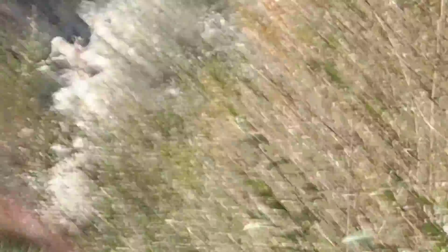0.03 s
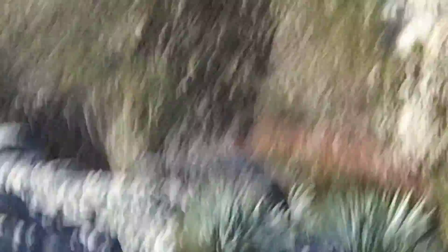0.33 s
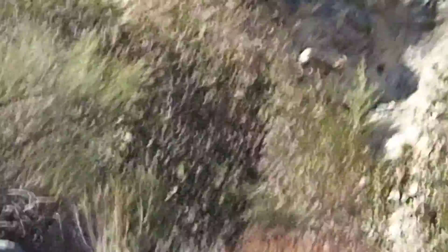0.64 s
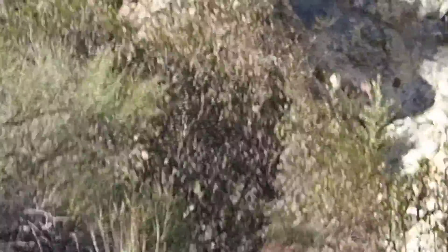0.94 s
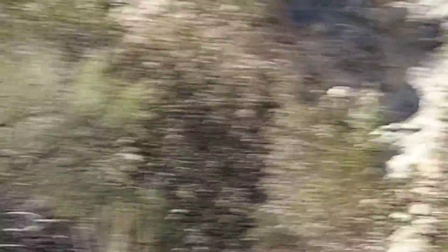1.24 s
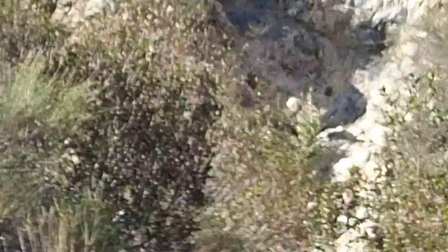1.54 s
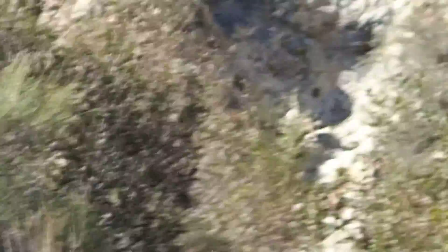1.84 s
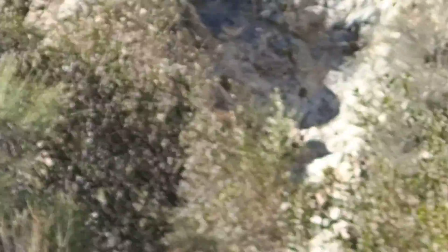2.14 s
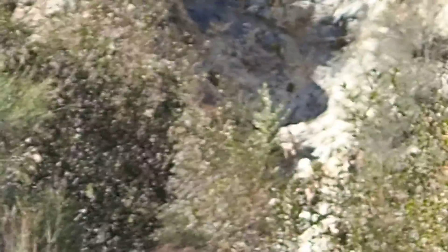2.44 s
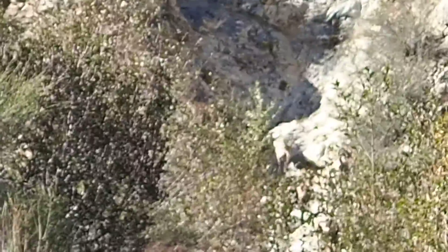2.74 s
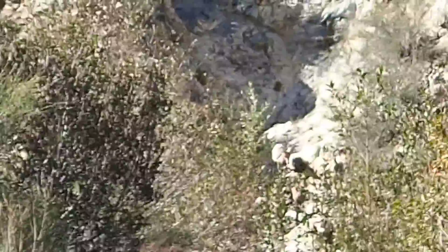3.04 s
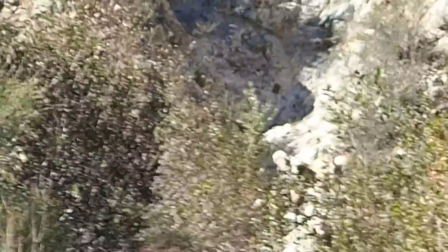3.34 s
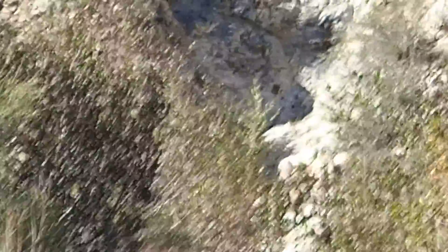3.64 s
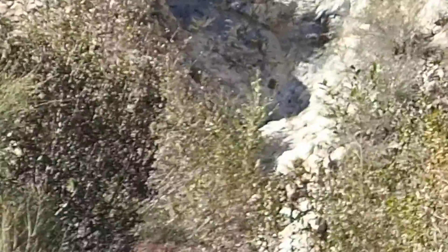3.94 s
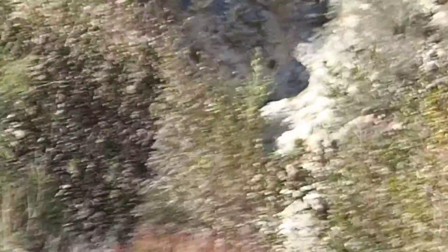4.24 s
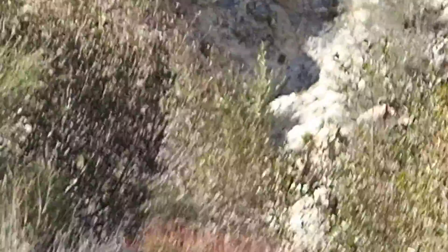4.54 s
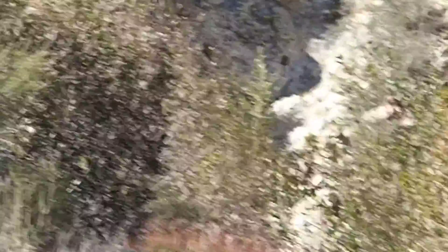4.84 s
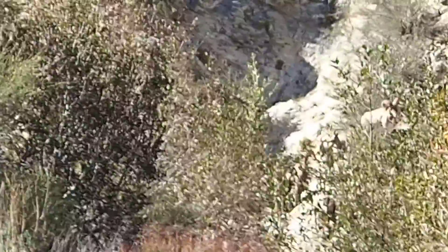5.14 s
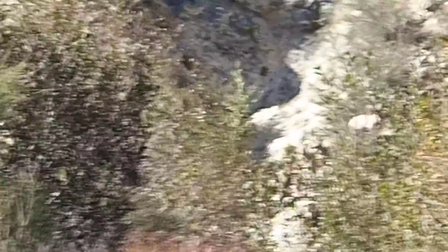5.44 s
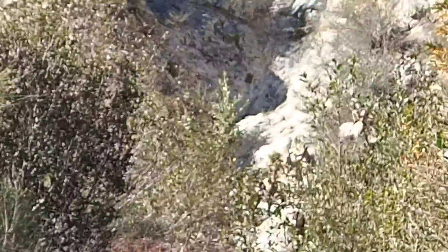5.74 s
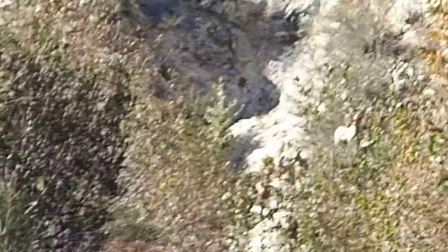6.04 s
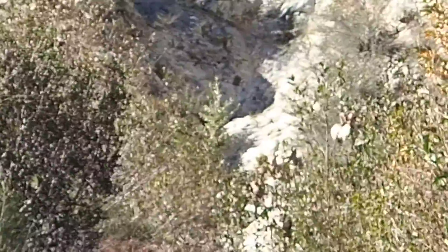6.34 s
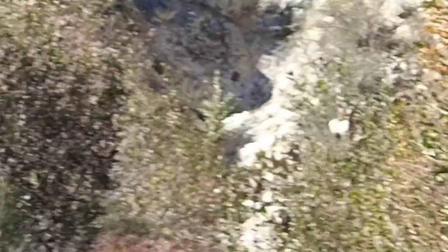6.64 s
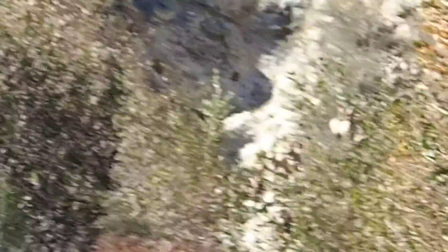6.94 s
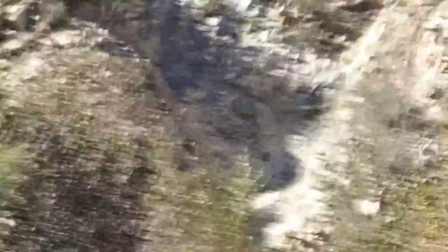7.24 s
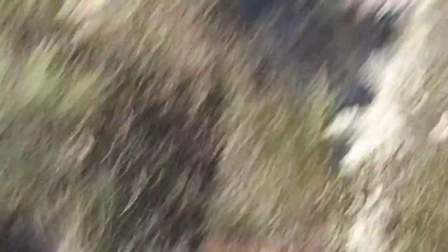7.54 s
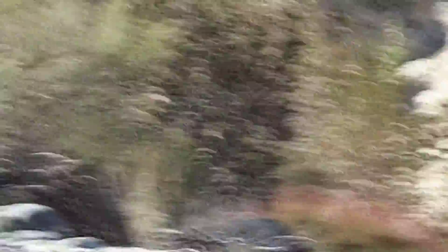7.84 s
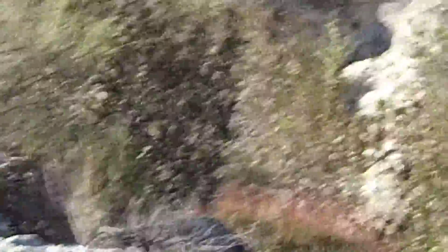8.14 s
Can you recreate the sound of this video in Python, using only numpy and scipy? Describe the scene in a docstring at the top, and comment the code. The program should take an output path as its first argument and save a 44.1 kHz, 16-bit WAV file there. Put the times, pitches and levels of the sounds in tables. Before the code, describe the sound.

A stream rushes steadily outdoors while rising gusts of wind thump and flap on the microphone, with a few sleeve swishes.

```python
"""A stream rushes at the foot of a brushy mountain slope, heard from a hand-held camera.
Its white water is a wash of noise, with air pockets ringing in it and droplets falling back.
Wind rises, mostly from the right: its eddies thump and flap right on the two microphone ports,
and the strongest make the limiter duck the stream. Close by, a sleeve swishes as the camera is swung."""
import sys
import numpy as np
from scipy import signal
from scipy.fft import rfft, irfft, next_fast_len
from scipy.io import wavfile
from scipy.ndimage import uniform_filter1d, map_coordinates

SR = 44100
rng = np.random.default_rng(int(sys.argv[2]) if len(sys.argv) > 2 else 0)


def to_wav(s):
    """Save 16-bit WAV."""
    ch = np.atleast_2d(s).T  # columns
    pcm = np.round(np.clip(ch, -1, 1) * 32767)  # PCM
    wavfile.write(sys.argv[1], SR, pcm.astype(np.int16))


N = 365148
T = np.arange(N) / SR
PORTS = np.array([[.5], [-.5]])  # splits a left-minus-right value between the two ports

# How alike the water is at the two ports. Each row: frequency in Hz, likeness from -1 (opposed) to 1.
WATER_LIKENESS = [(100, 0.69), (550, 0.87), (2600, 1), (4100, 1), (4700, 0.71), (5400, 0.37), (5800, -0.27),
                  (6200, -0.78), (7200, -0.67), (8500, -0.024), (10000, 0.18), (13000, -0.24)]
# The heaviest pressure swings in the gusts. Each row: centre in seconds, left and right level in dB.
PRESSURE_SLAMS = [(3.795, 0, -19.5), (4.122, -25, -9.5), (4.587, -7, 5.5), (4.671, -8, -4.5),
                  (4.812, -10.5, -4.5), (4.913, -12, -5), (5.163, -11, 0), (5.341, 3, 5.5), (6.137, 1, -15),
                  (6.194, -9, -3.5), (6.383, -5, -6), (6.46, 5, 9.5), (6.516, 6.5, -3), (6.578, 5, -4),
                  (6.65, -5, 1.5), (6.783, -12, -4), (7.041, -14.5, -10), (7.29, -9.5, -1.5),
                  (7.898, -9, -10)]
# Sharp pops inside the hardest gusts. Each row: start in seconds, level in dB.
PRESSURE_POPS = [(4.072, -24), (4.807, -4.5), (5.16, -6.5), (5.344, 1), (6.332, -12.5), (6.388, 0.5),
                 (6.452, -12), (6.46, 2.5)]


def amp(db):
    """Decibels to gain."""
    return 10 ** (np.asarray(db) / 20)


def unit(x):
    """x at rms 1."""
    return x / np.sqrt(np.mean(x ** 2) + 1e-20)


def along(points, hz):
    """(Hz, value) points joined on a log axis."""
    f, v = np.transpose(points)
    return np.interp(np.log(hz + 1), np.log(f + 1), v)


def wobble(rate):
    """A smooth random curve, rate knots a second."""
    return map_coordinates(rng.standard_normal(int(N * rate / SR) + 4), [T * rate])


def swell(at, rise, fall, hold=0):
    """An envelope that reaches 1 at the given time, holds and falls; all in seconds."""
    return np.exp(-(np.minimum(T - at, 0) / rise) ** 2 - (np.maximum(T - at - hold, 0) / fall) ** 2)


def filtered(x, response):
    """x times a response of frequency."""
    m = next_fast_len(x.shape[-1] + 8192)
    return irfft(rfft(x, m) * response(np.fft.rfftfreq(m, 1 / SR)), m)[..., :x.shape[-1]]


def rush(spectrum, likeness, patchy_db):
    """Stereo noise of rms 1 with brief patches of random gain, coloured by the camera's housing."""
    # The housing's peaks and notches. Each row: centre in Hz, width in Hz, gain in dB.
    housing = [(1870, 71, -9), (3013, 170, 5), (3400, 63, -9), (4033, 216, -6.5), (4578, 170, 8),
               (4810, 38, -26), (5170, 370, 7), (8030, 610, 5)]

    def mid_side_response(hz):
        housing_db = sum(db * np.exp(-((hz - centre) / width) ** 2) for centre, width, db in housing)
        angle = np.arccos(np.clip(along(likeness, hz), -1, 1)) / 2
        return amp(along(spectrum, hz) + housing_db) * [np.cos(angle), np.sin(angle)]

    bins = signal.stft(rng.standard_normal((2, N)), nperseg=512)[2]
    patches = uniform_filter1d(rng.standard_normal(bins.shape[1:]), size=5, axis=0)
    patches = unit(uniform_filter1d(patches, size=6, axis=1))
    noise = signal.istft(bins * amp(patchy_db * patches), nperseg=512)[1][:, :N]
    mid, side = filtered(noise, mid_side_response)
    return unit(np.array([mid + side, mid - side]))


def spray():
    """Droplets fall back on the water in faint, irregular spits and a few small splashes."""
    # The droplets' hiss. Each row: frequency in Hz, relative level in dB.
    spectrum = [(500, -29), (2500, -10), (5000, 12), (8000, -9), (15000, -14)]
    # Splashes on the rocks. Each row: centre in seconds, level in dB.
    rock_splashes = [(1.157, -43.5), (2.62, -44.5), (3.26, -43.5), (3.72, -43), (4.451, -43), (5.9, -37.5)]
    spits = amp(-54) * unit(amp(13.0 * np.tanh(wobble(140)) + 2.2 * wobble(9.8)))
    splashes = sum(amp(db) * np.exp(-((T - at) / 0.0057) ** 2) for at, db in rock_splashes)
    return (spits + splashes) * rush(spectrum, WATER_LIKENESS, patchy_db=1.5)


def bubbles(count, pitch_hz, spread_octaves, cycles, size_db):
    """Small air pockets ring in the water, each rising a little in pitch as it dies."""
    when, pitch, size = rng.random((3, count, 1))
    hz = pitch_hz * 2 ** (spread_octaves * (2 * pitch - 1))
    t = np.arange(SR // 25) / SR
    age = t * hz / cycles
    envelope = amp(-size_db * np.log(size + 0.033)) * age * np.exp(-2 * age)
    rings = envelope * np.sin(2 * np.pi * hz * t * (1 + 0.034 * age))
    index = (when * N).astype(int) + np.arange(len(t))
    return unit(np.bincount(index.ravel(), rings.ravel(), N)[:N])


def gurgles():
    """Larger air pockets close to the bank, each a short rising plop."""
    # Single plops. Each row: start in seconds, starting pitch in Hz, level in dB.
    plops = [(0.794, 1113, -33), (1.02, 898, -34.5), (1.58, 804, -35.5), (1.909, 651, -33),
             (4.213, 1220, -33), (5.769, 1227, -32.5), (6.069, 1020, -31.5)]
    out = np.zeros(N)
    age = np.arange(SR // 16) / SR / 0.0029
    for start, hz, db in plops:
        phase = 2 * np.pi * np.cumsum(hz * (1 + 0.0019 * age)) / SR
        out[round(start * SR):][:len(age)] += amp(db) * age * np.exp(1 - age) * np.sin(phase)
    return out


def stream():
    """White water with a soft babble in it, all wavering with the flow."""
    # The white water's rush. Each row: frequency in Hz, relative level in dB.
    spectrum = [(25, -24), (70, -24), (150, 2), (280, 3.5), (450, -2), (620, 0.5), (1250, -2), (1700, -4),
                (2100, -8.5), (2600, -15.5), (4000, -15.5), (6000, -10.5), (9500, -20), (15500, -25.5)]
    flow = amp(0.35 * wobble(2.2506) + 0.77 * wobble(11))
    white_water = amp(-41.5) * rush(spectrum, WATER_LIKENESS, patchy_db=1.57)
    babble = amp(-52) * bubbles(count=2000, pitch_hz=986, spread_octaves=0.752, cycles=4.0, size_db=7.5)
    return flow * (white_water + babble + gurgles())


def bearing(water, left_lag_s=2e-5):
    """The water lies slightly to the right, and the housing shades the left port."""
    # The water's balance at the ports. Each row: frequency in Hz, left minus right in dB.
    balance = [(60, 3), (130, 0.5), (290, -2.5), (640, -2.0), (1410, -2.5), (3100, 1), (6820, -0.5),
               (15000, -3)]
    delay = lambda hz: np.exp(-2j * np.pi * hz * PORTS * left_lag_s)
    return filtered(water, lambda hz: amp(PORTS * along(balance, hz)) * delay(hz))


def sleeve():
    """Cloth slides on cloth beside the microphone in short, slightly scratchy strokes."""
    # The sleeve's strokes. Each row: peak time, rise and fall in seconds, level in dB.
    swishes = [(.003, .01, 0.014, -36.5), (.088, 0.029, 0.036, -32.5), (.145, 0.027, 0.037, -40),
               (4.75, 0.027, 0.014, -46), (5.88, 0.076, .05, -61), (7.562, 0.075, 0.018, -38.5),
               (7.582, 0.011, 0.0069, -30), (7.745, 0.14, 0.076, -40), (8.059, 0.049, 0.087, -38)]
    # The cloth's hiss. Each row: frequency in Hz, relative level in dB.
    spectrum = [(300, -21), (2500, -16.5), (4500, -5.5), (5600, 3), (6800, -1.5), (8200, -5.5),
                (9500, -8.5), (11000, -20), (15500, -19)]
    # How alike it is at the two ports. Each row: frequency in Hz, likeness from -1 to 1.
    likeness = [(2000, .8), (5000, 0.11), (6500, -0.37), (12000, -0.5)]
    strokes = sum(amp(db) * swell(at, rise, fall) for at, rise, fall, db in swishes)
    scratch = amp(1.8 * wobble(250))
    return strokes * scratch * rush(spectrum, likeness, patchy_db=3) * amp([[-1], [1]])


def airflow():
    """Pressure in dB at the two ports: gusts and slams swell out of the breeze, and eddies stir both."""
    # The rising breeze between gusts. Each row: time in seconds, pressure in dB.
    breeze = [(0, -45), (.7, -48), (1.2, -43.5), (1.7, -48), (2.6, -46), (3.25, -35), (3.5, -46),
              (4.12, -30), (4.35, -46), (4.53, -42), (4.8, -24), (5.02, -35), (5.33, -21), (5.58, -41),
              (6.05, -39), (6.55, -13), (6.88, -29), (7.4, -22), (8.28, -26)]
    # Gusts on the ports. Each row: start and length in seconds, pressure in dB, left minus right in dB.
    gusts = [(0.087, .05, -35, 5.5), (0.414, 0.04, -24.5, -6), (1.104, 0.026, -35, 1),
             (1.441, 0.021, -33.5, 14), (2.221, 0.064, -29, 2), (2.814, .02, -26, 6),
             (2.972, 0.07, -28, -3), (3.113, 0.038, -26, -10), (3.21, .11, -27.5, -5),
             (3.584, 0.032, -26, -1), (3.796, .08, -16, 3), (3.89, 0.08, -30, -18), (4.06, 0.093, -20, -2),
             (4.629, 0.051, -13, -3), (4.793, 0.041, -14, -8), (4.905, 0.042, -14, 1),
             (5.156, 0.041, -14, -2), (5.335, 0.031, -4.5, -6), (5.436, 0.061, -27, -3),
             (5.655, 0.15, -26, -3), (5.924, .02, -33, -14), (6.109, .09, -13, -3.5),
             (6.26, 0.075, -18, -5), (6.382, .025, -10, -2), (6.511, 0.068, -4.5, 2), (6.629, .06, -13, -5),
             (6.835, 0.038, -22.5, -11), (6.959, 0.051, -22, -5), (7.041, 0.048, -14.5, -7),
             (7.286, 0.039, -14.5, -6.5), (7.485, 0.18, -18.5, -4), (7.829, 0.087, -18.5, -6.5),
             (7.996, 0.033, -17.5, 5.5), (8.15, 0.036, -22, -0.5)]
    breeze_side_db, sag_db_per_s, swirl_db, eddies_per_s = -4.5, 22, -11, 48
    power = amp(np.interp(T, *np.transpose(breeze)) + PORTS * breeze_side_db) ** 2
    for start, length, db, side_db in gusts:
        sag_db = sag_db_per_s * np.clip(T - start, 0, length)  # a gust is strongest at its front
        envelope = swell(start, rise=.009, fall=.016, hold=length)
        power += (amp(db - sag_db + PORTS * side_db) * envelope) ** 2
    for at, left_db, right_db in PRESSURE_SLAMS:  # rough air swirls round each slam
        power += (amp([[left_db], [right_db]]) * amp(swirl_db) * swell(at, rise=.012, fall=.012)) ** 2
    shared_eddies, left_eddies, right_eddies = (np.tanh(wobble(eddies_per_s)) for _ in range(3))
    return 10 * np.log10(power) + 2.5 * shared_eddies + 3 * np.array([left_eddies, right_eddies])


def flaps(flow_db):
    """The flow lets go of a port for milliseconds and flaps: fitfully in wind, and at each slam and pop."""
    # Flapping at a port's edge. Each row: frequency in Hz, relative level in dB.
    spectrum = [(100, -17), (300, 5.5), (520, 2), (750, -5.5), (1100, -14), (1600, -27), (2500, -41),
                (4500, -46), (9000, -88)]
    growth_db_per_db, fit_depth_db, slam_lag_s = 1.815, 15.5, 0.0029
    fits = np.tanh([wobble(110), wobble(110)])
    strength = amp(-17 + growth_db_per_db * flow_db + fit_depth_db * fits)
    for at, left_db, right_db in PRESSURE_SLAMS:
        envelope = swell(at + slam_lag_s, rise=0.0095, fall=0.0095)
        strength += amp([[left_db], [right_db]]) * amp(-18) * envelope
    for at, db in PRESSURE_POPS:
        strength += amp(db - 11.5) * swell(at, rise=0.0088, fall=0.0088)
    noise = unit(filtered(rng.standard_normal((2, N)), lambda hz: amp(along(spectrum, hz))))
    local_power = np.abs(uniform_filter1d(noise ** 2, size=300))
    return strength * unit(noise / np.sqrt(local_power + .02))


def pops(push_s=0.0014, dull_hz=2600):
    """Flow tears off a port's edge: an abrupt push and a slower pull, louder on the right."""
    out = np.zeros(N)
    age = np.arange(SR // 50) / SR / push_s
    for start, db in PRESSURE_POPS:
        out[round(start * SR):][:len(age)] += amp(db) * (1 - age) * np.exp(-age)
    return filtered(out, lambda hz: 1 / (1 + 1j * hz / dull_hz) ** 2) * amp([[-4], [0]])


def slams(width_s=.0017):
    """Each slam is one violent push and pull of air against the ports."""
    out = np.zeros((2, N))
    lead = SR // 50
    offset = np.arange(-lead, lead) / SR / width_s
    swing = -offset * np.exp(.5 - offset ** 2) * np.sqrt(2)
    for at, left_db, right_db in PRESSURE_SLAMS:
        out[:, round(at * SR) - lead:][:, :len(swing)] += amp([[left_db], [right_db]]) * swing
    return out


def buffet(level_db, evenness):
    """A frozen pattern of turbulence sweeps past one port: faster air is both louder and higher."""
    # The turbulence at speed 1. Each row: frequency in Hz, relative level in dB.
    spectrum = [(20, -7.5), (90, 5), (190, 5.5), (320, -3), (450, -15), (700, -36.5), (1200, -61),
                (2500, -61), (6000, -110)]
    # How fast it sweeps past. Each row: pressure in dB, relative speed.
    sweep_speeds = [(-45, .36), (-32, .44), (-24, .66), (-17, .94), (-6, 1.45)]
    pattern = unit(filtered(rng.standard_normal(2 * N), lambda hz: amp(along(spectrum, hz))))
    local_power = np.abs(uniform_filter1d(uniform_filter1d(pattern ** 2, size=500), size=300))
    pattern = unit(pattern / (local_power + 0.011) ** (evenness / 2))
    flutter = wobble(130)  # small eddies ride on the large ones and make them ragged
    speed = np.interp(level_db, *np.transpose(sweep_speeds)) * amp(flutter)
    swept = map_coordinates(pattern, [np.cumsum(speed)], order=1, mode="mirror")
    return amp(level_db + 1.305 * flutter - 1.0) * swept


def wind(flow_db, vent_hz=42):
    """Each port feels its own turbulence; pressure slower than vent_hz leaks round the membrane."""
    pressure = np.array([buffet(port_db, evenness=0.54) for port_db in flow_db])
    return amp(2.23) * filtered(pressure, lambda hz: 1j * hz / (vent_hz + 1j * hz))


def scene():
    """Stream, wind and sleeve at the two microphone ports."""
    flow_db = airflow()
    water = bearing(stream() + spray())
    return water + wind(flow_db) + slams() + flaps(flow_db) + pops() + sleeve()


def limiter(x, ceiling_db, release_s):
    """One gain for both channels: it drops quickly on a peak and creeps back."""
    peak_db = 20 * np.log10(np.abs(x).max(axis=0) + 1e-9)
    over_db = np.maximum(peak_db - ceiling_db, 1e-6)
    held_db = np.exp(np.maximum.accumulate(np.log(over_db) + T / release_s) - T / release_s)
    return x * amp(-uniform_filter1d(held_db, size=200))


def record(dry):
    """The camera limits the gusts and keeps nothing above its band limit."""
    return filtered(limiter(dry, ceiling_db=-8.5, release_s=0.093), lambda hz: hz < 15800)


dry = scene()
out = record(dry)
to_wav(out)
```